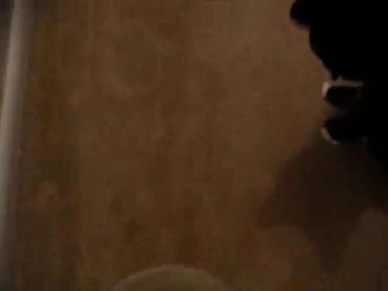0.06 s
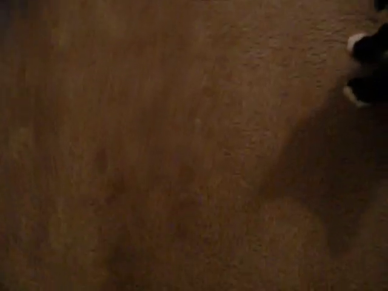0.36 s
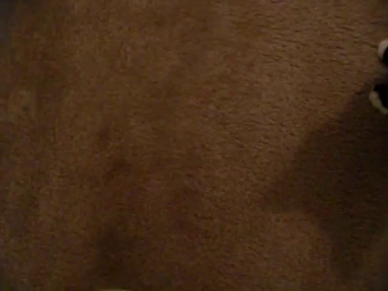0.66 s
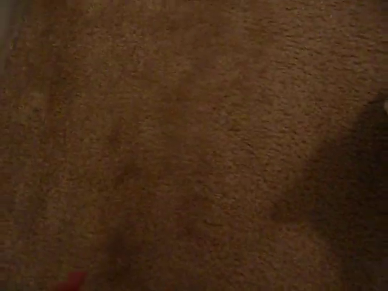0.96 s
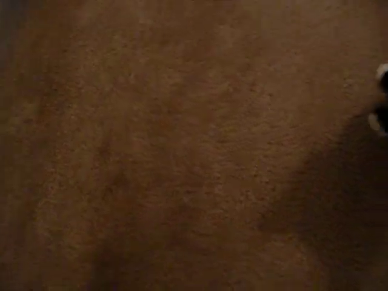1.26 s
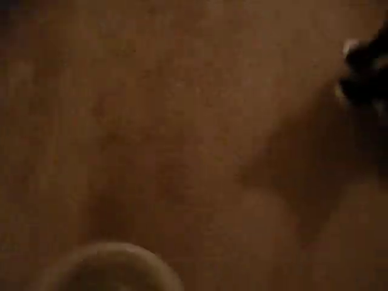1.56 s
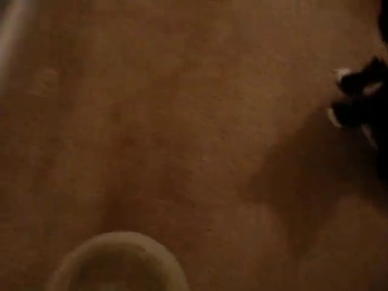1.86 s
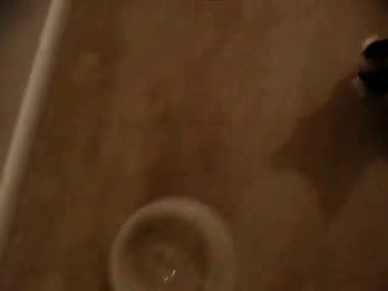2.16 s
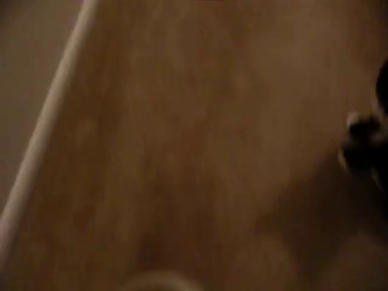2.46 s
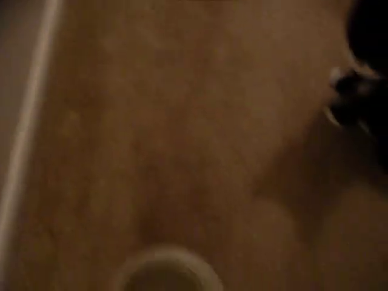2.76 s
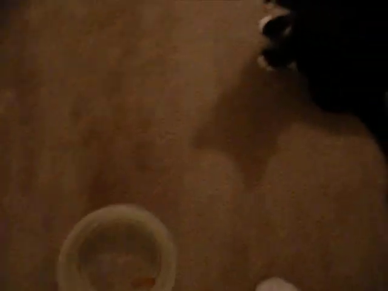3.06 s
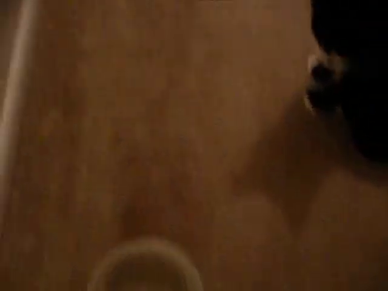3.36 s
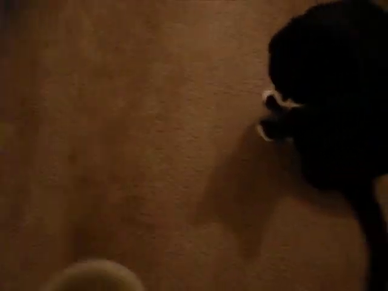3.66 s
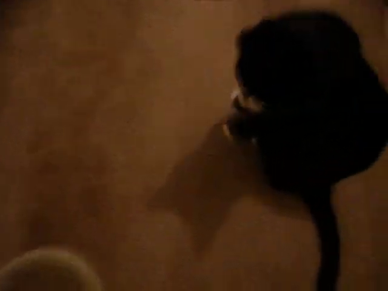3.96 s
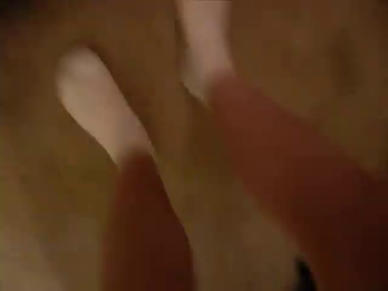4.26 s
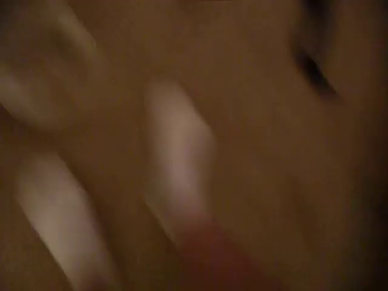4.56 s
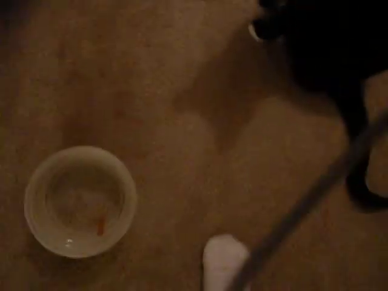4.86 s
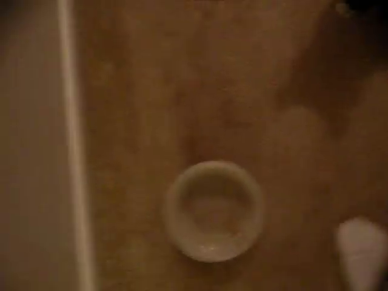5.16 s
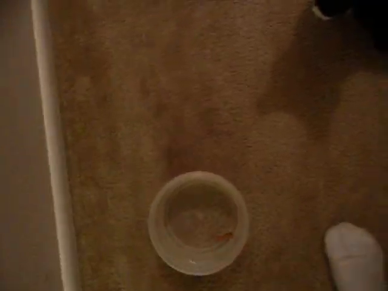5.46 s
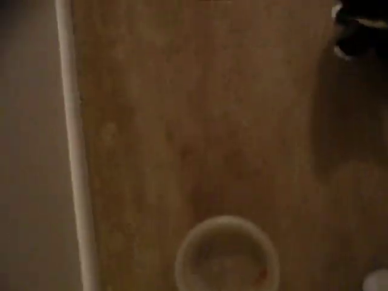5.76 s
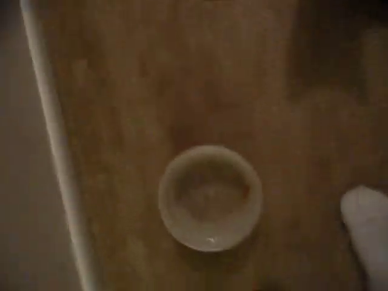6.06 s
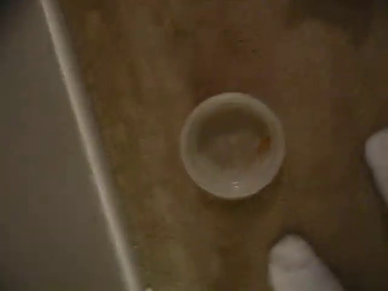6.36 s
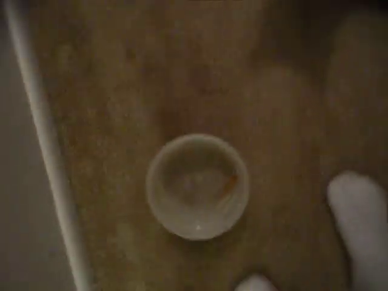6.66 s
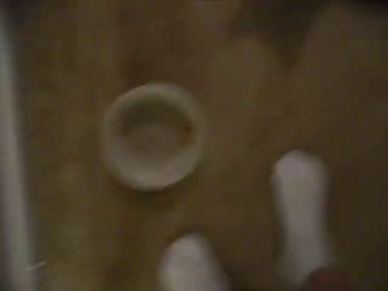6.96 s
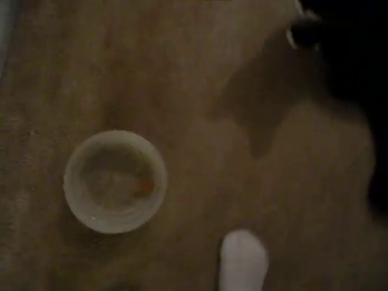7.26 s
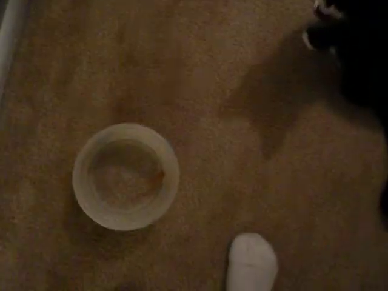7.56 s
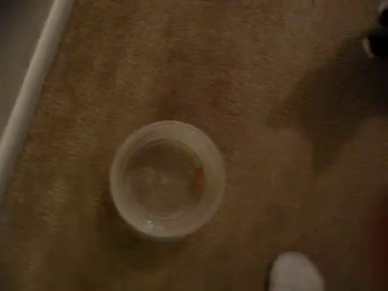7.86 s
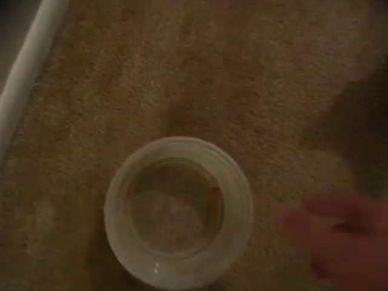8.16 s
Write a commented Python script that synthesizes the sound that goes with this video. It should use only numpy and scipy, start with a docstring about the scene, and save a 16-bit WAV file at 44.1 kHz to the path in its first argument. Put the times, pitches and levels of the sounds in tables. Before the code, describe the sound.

Close handling of a plastic container: light ticks, scrapes, dull thumps and three sharp knocks in a quiet, faintly humming room.

```python
"""In a quiet carpeted room, hard plastic is handled right at the microphone.
Fingers tap and rub the thin shell, making it tick and creak, and firm pushes add a dull thump.
Three times its wall buckles or springs back with knocks loud enough to overload the sound.
Behind it all are a steady hiss, a mains hum and a faint wavering whine."""
import sys
import numpy as np
from scipy import signal
from scipy.fft import rfft, irfft
from scipy.io import wavfile

SR = 44100
rng = np.random.default_rng(int(sys.argv[2]) if len(sys.argv) > 2 else 0)


def output_pcm(signal):
    """Save a mono or channel-first signal as 16-bit PCM at the path in sys.argv[1].

    Samples are clipped to [-1, 1] before scaling.
    """
    pcm = np.clip(np.atleast_2d(signal).T, -1, 1) * 32767
    wavfile.write(sys.argv[1], SR, np.round(pcm).astype(np.int16))


N = 369999

# A "colour" is four levels, from low to high pitch: hollow, knock, edge and crack (see shell).
# Ways a finger lands, by name: (chatter [s], hollow [dB], knock [dB], edge [dB], crack [dB])
TOUCHES = {"pad": (.002, 14, 7, -9, -16), "flat": (.003, 6, 1.5, -2.5, -13),
           "wall": (.0009, -20, 7, -5, -7), "scuff": (.0024, -9, -6, -7, -17),
           "rim": (.0005, -24, -17, -8, -17), "tip": (.0006, -12, -13, -2, -2),
           "nail": (.0006, 1.5, 2, 3.5, -1)}
# Ways a finger slides, by name: (share of tiny slips [0-1], hollow [dB], knock [dB], edge [dB], crack [dB])
SLIDES = {"grip": (.75, 12, 6, 2, -3), "creak": (.88, -5, -7, -6, -6), "hollow": (.5, 6, 20, 1, 1),
          "brush": (.25, 2.5, 1.5, -2, -7), "airy": (.3, -2, -3, 0, -.5),
          "dry": (.22, -16, -1.5, -4.5, -12), "ring": (.45, -15, -15, -10, -19),
          "squeak": (.07, -28, -21, -2.5, -8.5), "hiss": (.1, -4, -5, 9, 12)}


def snaps(level_db):
    """The wall strains, then snaps. The bend travels round it and returns, making the sound hollow."""
    # The wall buckles or springs back: (time [s], level [dB], chatter [s], lap time [s],
    # returning share [negative = upside down], hollow [dB], knock [dB], edge [dB], crack [dB])
    buckles = [(3.2143, -6, .002, .00035, .3, -34, 0, -7, -9.5),
               (3.2262, -10, .0017, .00035, .25, -28, 8, 4.5, 1),
               (4.7108, -9.5, .0005, .00072, -.45, -13, 2, 8, 6),
               (4.7156, -11.5, .0026, .00072, -.45, -18, -7, 4, 0),
               (7.0414, -9, .00056, .00069, -.4, -5, -9, 3, 2),
               (7.0431, -11, .0007, .00069, -.4, -24, -12, 4, -5),
               (7.096, -13, .0006, .0005, .2, -36, -24, -35, -13)]
    rise_s, fall_s, strain_db = .005, .006, -27
    out = np.zeros(N)
    for s, db, chatter_s, lap_s, lap_share, *colour_db in buckles:
        snap = blow(db + level_db, chatter_s, colour_db)
        samples = np.arange(len(snap))
        returning = np.interp(samples - lap_s * SR, samples, snap)
        add(out, s, snap.std() * rms_one(snap + lap_share * returning))
        add(out, s - rise_s, stroke(rise_s, fall_s, db + strain_db, SLIDES["brush"]))
    return out


def taps(level_db):
    """Fingers land on the shell and drag a little as they come and go."""
    # Finger landings: (time [s], level [dB], touch [name])
    landings = [(1.3255, -48.5, "rim"), (1.3517, -41, "scuff"), (1.3577, -43.5, "tip"),
                (1.3709, -48, "nail"), (1.401, -44, "pad"), (1.4175, -32.5, "flat"),
                (1.4205, -33.5, "wall"), (1.437, -41, "pad"), (1.5288, -38, "pad"), (1.542, -40, "scuff"),
                (1.553, -40, "flat"), (1.6147, -31.5, "nail"), (1.6379, -36, "pad"), (1.6682, -36.5, "tip"),
                (1.7053, -30, "wall"), (1.71, -27, "wall"), (1.885, -51, "pad"), (1.9016, -36, "nail"),
                (1.9845, -45.5, "scuff"), (2.0798, -46, "pad"), (2.298, -54, "tip"), (2.58, -38.5, "rim"),
                (2.9705, -26.5, "flat"), (3.0121, -36.5, "tip"), (3.2654, -27, "tip"),
                (3.2752, -26.5, "wall"), (3.4255, -38, "rim"), (3.5643, -30.5, "rim"),
                (3.726, -37, "scuff"), (3.8937, -28, "nail"), (3.8984, -32.5, "pad"), (4.6567, -41, "flat"),
                (4.6995, -33, "flat"), (4.7324, -32, "wall"), (4.81, -39.5, "scuff"), (4.8386, -28, "rim"),
                (4.8554, -37, "flat"), (4.9082, -33.5, "scuff"), (5.3368, -47, "tip"),
                (5.8219, -51.5, "nail"), (6.0871, -48.5, "flat"), (6.1876, -34.5, "tip"),
                (6.3131, -43.5, "pad"), (6.4129, -47, "pad"), (6.5854, -47.5, "scuff"), (6.643, -48, "pad"),
                (6.662, -51, "tip"), (6.7035, -42, "pad"), (6.7149, -44.5, "scuff"),
                (6.991, -42.5, "scuff"), (7.1047, -36, "tip"), (7.1145, -37, "rim"), (7.122, -39, "tip"),
                (7.14, -36, "tip"), (7.3272, -42, "nail"), (7.4204, -43, "nail"), (7.4681, -45.5, "flat"),
                (7.8392, -33, "nail")]
    rise_s, fall_s, drag_db, slip_share = .007, .022, -17.5, .4
    out = np.zeros(N)
    for s, db, touch in landings:
        chatter_s, *colour_db = TOUCHES[touch]
        add(out, s, blow(db + level_db, chatter_s, colour_db))
        add(out, s - rise_s, stroke(rise_s, fall_s, db + drag_db, (slip_share, *colour_db)))
    return out


def rubs(level_db):
    """Fingers slide over the shell, each pressing harder and then letting go."""
    # Finger strokes: (time of hardest press [s], rise [s], fall [s], level [dB], slide [name])
    strokes = [(1.44, .047, .043, -41, "grip"), (1.487, .015, .056, -46, "creak"),
               (1.544, .024, .05, -39.5, "grip"), (1.635, .066, .043, -41, "creak"),
               (1.695, .02, .012, -39, "dry"), (1.704, .023, .015, -31, "hollow"),
               (2.102, .012, .035, -50.5, "hollow"), (2.575, .025, .018, -49, "dry"),
               (2.981, .01, .03, -41, "brush"), (3.009, .012, .008, -40, "brush"),
               (3.234, .0045, .085, -30.5, "dry"), (3.43, .071, .099, -52, "creak"),
               (3.485, .01, .022, -35.5, "dry"), (3.52, .012, .034, -39.5, "dry"),
               (3.559, .015, .02, -38.5, "dry"), (3.711, .01, .02, -44, "grip"),
               (3.751, .034, .036, -37.5, "dry"), (3.805, .03, .045, -43, "creak"),
               (3.927, .025, .017, -42, "grip"), (3.96, .022, .062, -48, "dry"),
               (4.072, .031, .01, -44, "brush"), (4.115, .051, .074, -48, "brush"),
               (4.247, .032, .006, -44, "airy"), (4.665, .009, .046, -45, "creak"),
               (4.816, .026, .045, -38, "ring"), (4.879, .045, .017, -41, "ring"),
               (5.439, .012, .035, -42, "airy"), (5.508, .058, .069, -41.5, "brush"),
               (5.557, .009, .042, -44, "hollow"), (6.17, .1, .044, -48.5, "brush"),
               (6.522, .053, .026, -47, "airy"), (7.035, .041, .012, -39.5, "brush"),
               (7.069, .022, .045, -36, "squeak"), (7.0913, .0097, .011, -8, "squeak"),
               (7.132, .0052, .0085, -25.5, "hiss"), (7.161, .0065, .015, -20.5, "hiss"),
               (7.197, .0076, .007, -36, "squeak"), (7.321, .068, .041, -49, "grip"),
               (7.42, .095, .09, -51.5, "brush"), (7.582, .13, .11, -50, "airy"),
               (7.737, .028, .008, -41, "brush"), (7.756, .017, .026, -45, "airy"),
               (7.794, .019, .018, -45, "dry")]
    out = np.zeros(N)
    for s, rise_s, fall_s, db, slide in strokes:
        add(out, s - rise_s, stroke(rise_s, fall_s, db + level_db, SLIDES[slide]))
    return out


def thumps(level_db, cutoff_hz, shove_share):
    """A firm push shoves the whole hand-held body, which swings briefly."""
    # Pushes: (time [s], level [dB], pitch [Hz], time to fade by 60 dB [s])
    pushes = [(1.412, -36, 150, .021), (1.513, -41, 58.4, .14), (1.613, -36, 120, .03),
              (2.9703, -17, 285, .017), (3.2155, -24.5, 85, .03), (3.709, -39, 260, .03),
              (3.8947, -25.5, 98, .072), (4.654, -35, 150.4, .026), (4.710, -23.5, 110, .038),
              (7.0395, -24.5, 50, .034), (7.084, -35, 129.9, .025)]
    out, t = np.zeros(N), np.arange(SR // 8) / SR
    for s, db, hz, fade_s in pushes:
        swing = np.cos(2 * np.pi * hz * t) + shove_share
        add(out, s, from_db(db + level_db - 60 * t / fade_s) * swing)
    return low_pass(out, cutoff_hz)


def faint_ticks(level_db, spread_db, count, between_s):
    """Small ticks come at random moments as the grip shifts."""
    out, touches = np.zeros(N), list(TOUCHES.values())
    for k, (when, softness) in enumerate(rng.random((count, 2))):
        chatter_s, *colour_db = touches[k % len(touches)]
        tick = blow(level_db - spread_db * softness, chatter_s, colour_db, build_s=.0006)
        add(out, np.interp(when, [0, 1], between_s), tick)
    return out


def blow(db, chatter_s, colour_db, build_s=.00062):
    """One sharp hit on the shell, then a very short chatter as the surfaces settle."""
    t = np.arange(SR // 20) / SR
    chatter = rng.standard_normal(len(t)) * (1 - np.exp(-t / build_s)) * np.exp(-t / chatter_s)
    force = chatter / np.linalg.norm(chatter) + (t == 0)
    gain = from_db(db) * np.sqrt(.01 / t[-1])   # db counts the energy as if packed into 10 ms
    return gain * shell(force, colour_db, damping=1.5)


def stroke(rise_s, fall_s, db, slide, slips_per_s=900, spread_db=4.5):
    """A sliding finger mixes smooth rubbing with tiny uneven slips, and deadens the shell's ring."""
    t = np.arange(SR // 3) / SR
    slip_share, *colour_db = slide
    slips = (rng.random(len(t)) < slips_per_s / SR) * rng.choice([-1, 1], len(t))
    slip_sizes = from_db(spread_db * np.minimum(rng.exponential(1, len(t)), 3))
    smooth = rng.standard_normal(len(t))
    friction = np.sqrt(slip_share) * rms_one(slips * slip_sizes) + np.sqrt(1 - slip_share) * smooth
    length = round((rise_s + fall_s) * SR) + SR // 100
    pressure = np.interp(t[:length] - rise_s, [-rise_s, 0, fall_s], [0, 1, 0])
    gain = from_db(db) * np.sqrt(np.mean(pressure ** 2))
    return gain * shell(friction[:length] * pressure, colour_db, damping=3.9)


def shell(force, colour_db, damping):
    """The shell rings at its own pitches; where it is touched decides how strongly each one answers."""
    # The shell's natural tones: (pitch [Hz], width before damping [Hz], level [dB])
    tones = [(402, 320, -5), (596.5, 250, -1), (857, 170, -5), (1040, 63, -3), (1270, 570, -8.5),
             (1720, 430, -8), (2137, 190, -2.5), (2397, 220, -1), (2896, 600, -2), (3447, 210, -1.5),
             (4020, 280, -6), (4700, 200, -8), (5640, 290, -6), (7220, 560, -3.5)]
    # Centres of its five pitch ranges: (hollow [Hz], knock [Hz], ring [Hz], edge [Hz], crack [Hz])
    ranges_hz = [500, 1050, 2200, 3400, 5800]
    hollow, knock, edge, crack = colour_db   # relative to the ring range
    out = 0
    for k, (hz, width_hz, db) in enumerate(tones):
        place_db = np.interp(np.log(hz), np.log(ranges_hz), [hollow, knock, 0, edge, crack])
        tone = resonate(force, hz, width_hz * damping)
        tone = resonate(tone, hz, .25 * hz)   # falls away steeply far from its pitch
        out = out + (-1) ** k * from_db(db + place_db) * rms_one(tone)
    # The small shell gives off little below its lowest tone.
    bass_cut = signal.butter(1, 222, "high", fs=SR)
    return rms_one(signal.lfilter(*bass_cut, out))


def room(x, cutoff_hz, fade_s):
    """Carpet leaves only a short, dull wash of echoes."""
    t = np.arange(SR // 3) / SR
    echoes = rng.standard_normal(len(t)) * from_db(-60 * t / fade_s) * (t > .005)
    tail = low_pass(echoes, cutoff_hz)
    return signal.fftconvolve(x, tail / np.linalg.norm(tail))[:N]


def hiss(level_db):
    """A steady hiss, strongest in the bass."""
    # The tone of the hiss: (frequency [Hz], relative level [dB])
    spectrum = [(20, 0), (50, -6.5), (100, -7), (200, -9), (400, -12.5), (800, -13.5), (1300, -17),
                (2500, -19), (5000, -22.5), (7200, -23), (8000, -32), (9000, -54)]
    hz, db = np.transpose(spectrum)
    gains = from_db(np.interp(np.log(np.fft.rfftfreq(N, 1 / SR) + 1), np.log(hz), db))
    return from_db(level_db) * rms_one(irfft(rfft(rng.standard_normal(N)) * gains, N))


def mains_hum(level_db, hz):
    """The mains supply hums on one low, steady tone."""
    t = np.arange(N) / SR
    return from_db(level_db) * np.sqrt(2) * np.sin(2 * np.pi * hz * t)


def whine(level_db, hz, width_hz):
    """A faint whine wavers: noise narrowed down to almost a single pitch."""
    # How the whine swells and fades: (time [s], level [dB])
    swells = [(0, -68.5), (.55, -78), (1.15, -65.5), (1.9, -70), (2.3, -72), (2.6, -68), (3.6, -71),
              (5.0, -71), (6.5, -72.5), (8.39, -71.5)]
    swell_db = np.interp(np.arange(N) / SR, *np.transpose(swells))
    band = resonate(rng.standard_normal(N), hz, width_hz)
    return from_db(level_db + swell_db) * rms_one(resonate(band, hz, width_hz))


def from_db(db):
    """Turn decibels into a number to multiply by."""
    return 10 ** (np.asarray(db) / 20)


def rms_one(x):
    """Scale a sound so that its average strength (rms) is 1."""
    return x / np.sqrt(np.mean(x ** 2) + 1e-20)


def add(out, s, sound):
    """Mix a sound in, starting at s seconds."""
    at = max(round(s * SR), 0)
    out[at:at + len(sound)] += sound[:max(N - at, 0)]


def resonate(x, hz, width_hz):
    """Make a sound ring at one pitch; a smaller width rings longer."""
    r = np.exp(-np.pi * width_hz / SR)
    feedback = [1, -2 * r * np.cos(2 * np.pi * hz / SR), r * r]
    return signal.lfilter(np.array([1, 0, -1]) * (1 - r * r) / 2, feedback, x + 1e-18)


def low_pass(x, hz):
    """Gently dull everything above hz."""
    return signal.sosfilt(signal.butter(2, hz, fs=SR, output="sos"), x)


def scene():
    """The plastic up close, a trace of the room and the quiet background, in one channel."""
    background = hiss(level_db=-62.5) + mains_hum(level_db=-66.5, hz=120)
    background += whine(level_db=.8, hz=630, width_hz=22)
    handling = snaps(level_db=-1.46) + taps(level_db=-1.46) + rubs(level_db=-2.8)
    handling += thumps(level_db=-1.5, cutoff_hz=450, shove_share=.31)
    handling += faint_ticks(level_db=-57, spread_db=7, count=18, between_s=(1.3, 7.8))
    echoes = from_db(-36) * room(handling, cutoff_hz=3940, fade_s=.1)
    return (handling + echoes + background)[None]


def record(dry):
    """The top treble is cut; the hardest knocks then overload, which spills new treble above the cut."""
    input_hz, overload, output_hz = 8100, .7, 16600
    input_filter = signal.firwin(91, input_hz, window=("kaiser", 8), fs=SR)
    output_filter = signal.firwin(255, output_hz, window=("kaiser", 9), fs=SR)
    narrow = signal.fftconvolve(dry, input_filter[None], "same")
    clipped = np.clip(narrow, -overload, overload)
    return signal.fftconvolve(clipped, output_filter[None], "same")


dry = scene()
out = record(dry)
output_pcm(out)
```